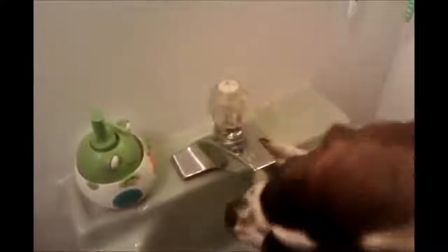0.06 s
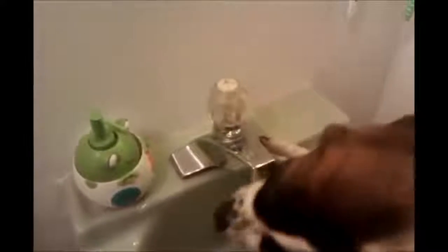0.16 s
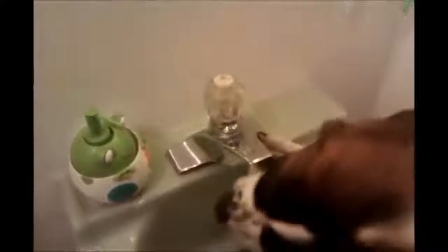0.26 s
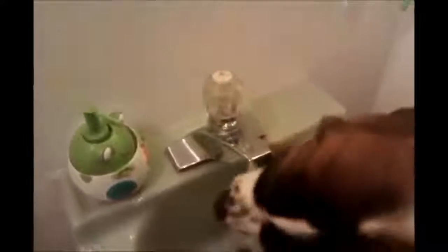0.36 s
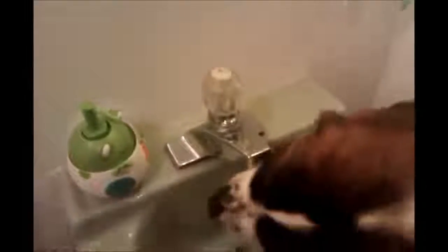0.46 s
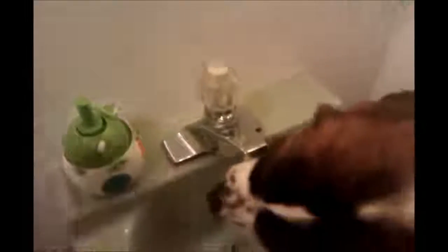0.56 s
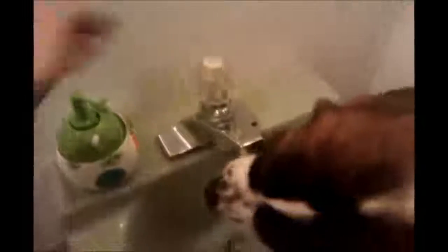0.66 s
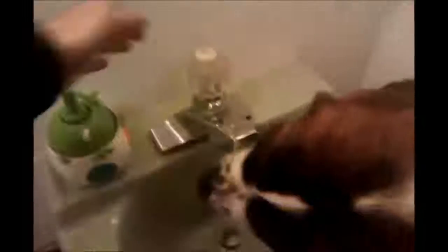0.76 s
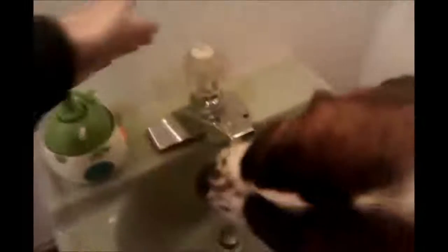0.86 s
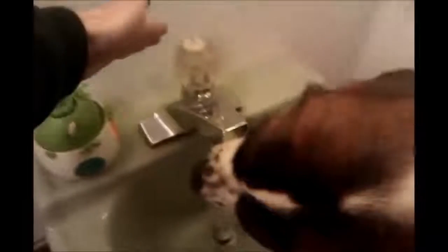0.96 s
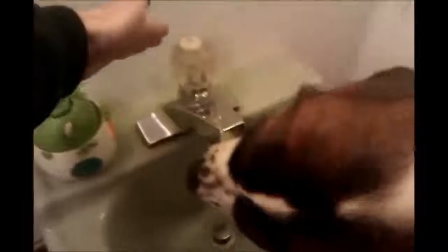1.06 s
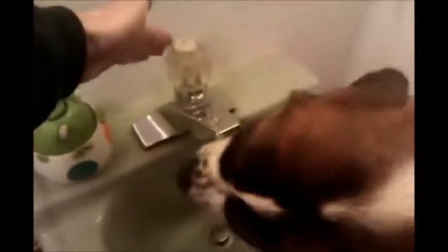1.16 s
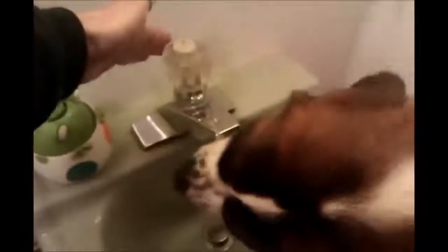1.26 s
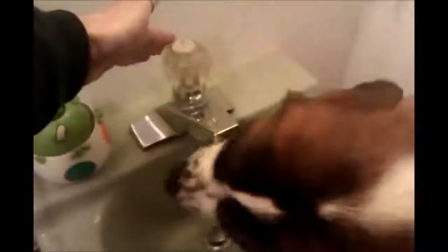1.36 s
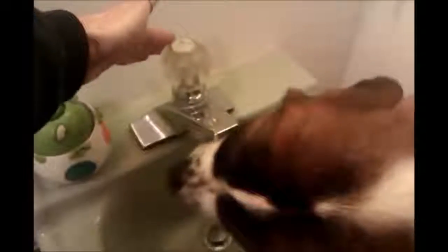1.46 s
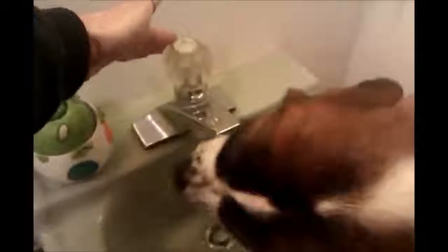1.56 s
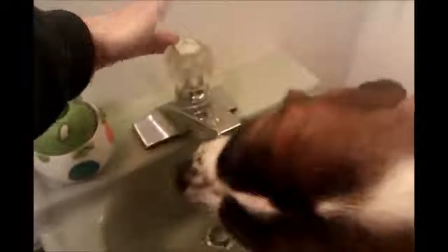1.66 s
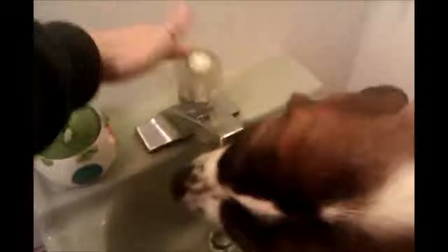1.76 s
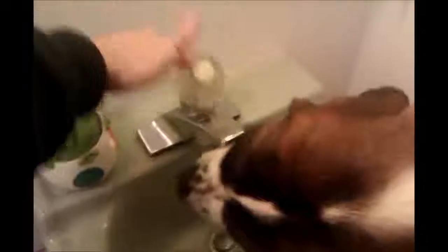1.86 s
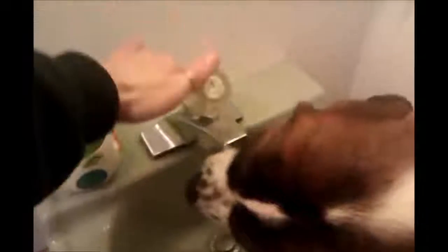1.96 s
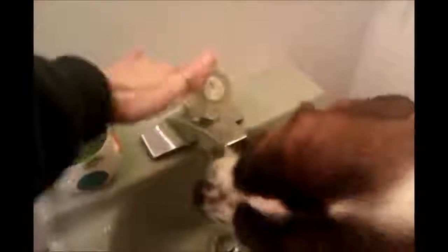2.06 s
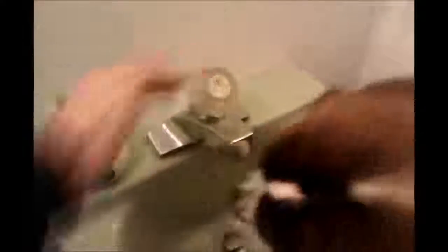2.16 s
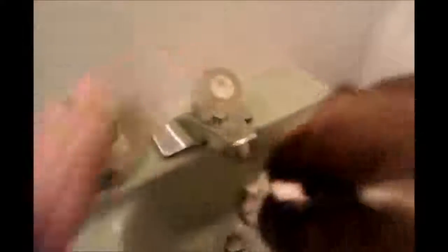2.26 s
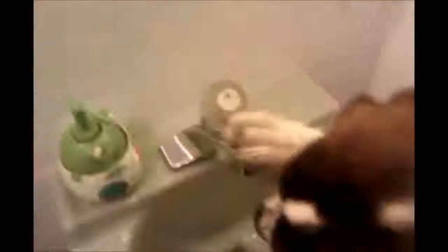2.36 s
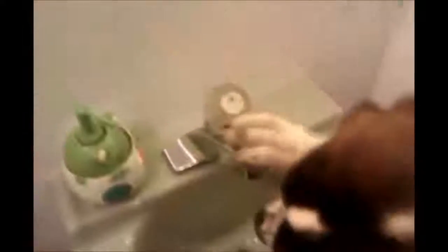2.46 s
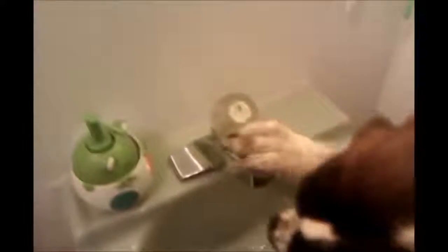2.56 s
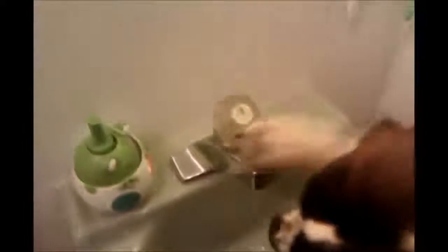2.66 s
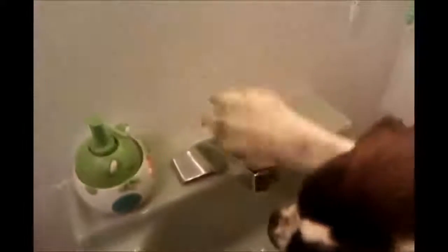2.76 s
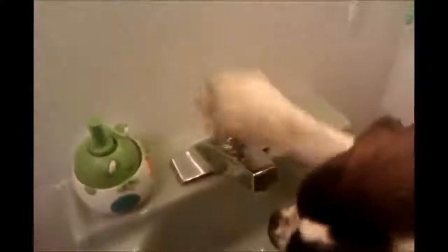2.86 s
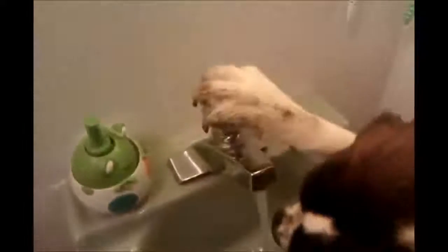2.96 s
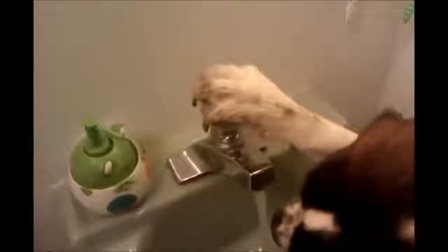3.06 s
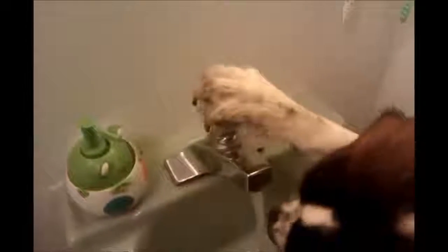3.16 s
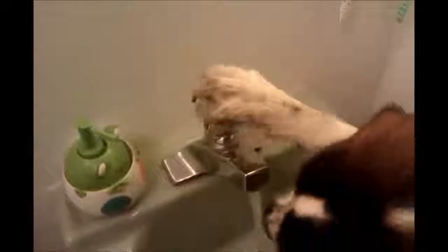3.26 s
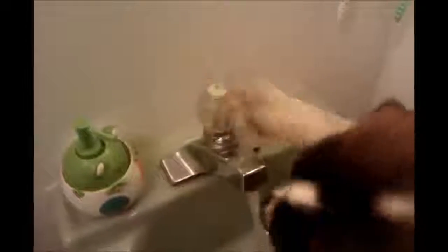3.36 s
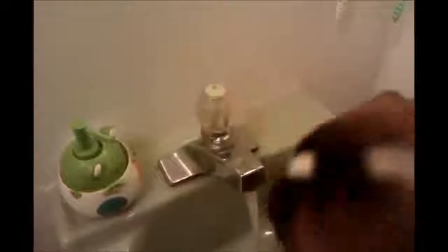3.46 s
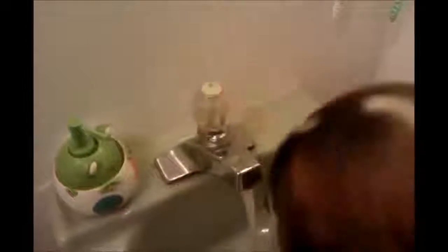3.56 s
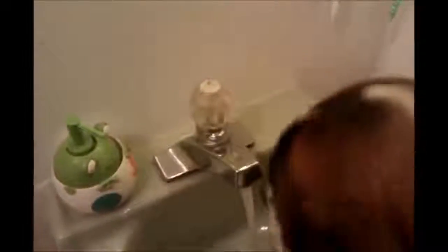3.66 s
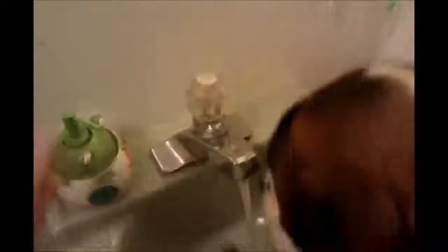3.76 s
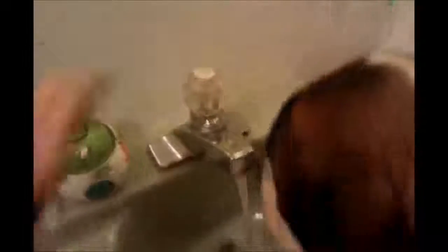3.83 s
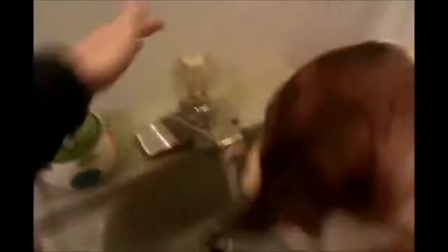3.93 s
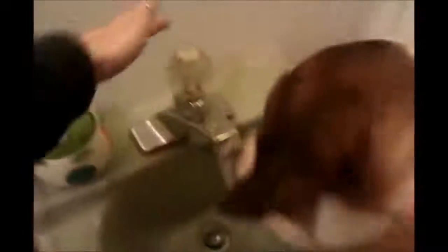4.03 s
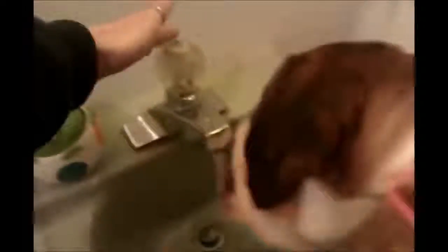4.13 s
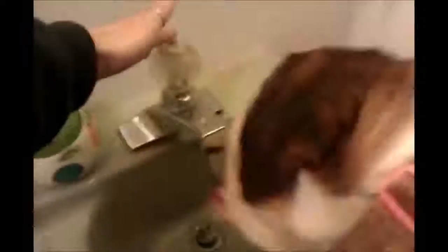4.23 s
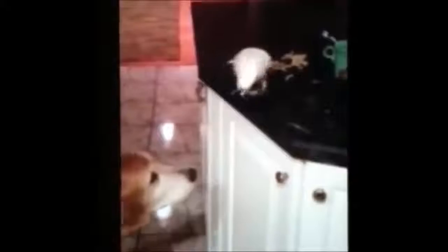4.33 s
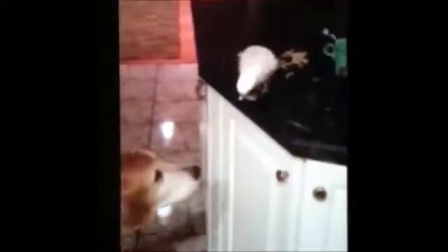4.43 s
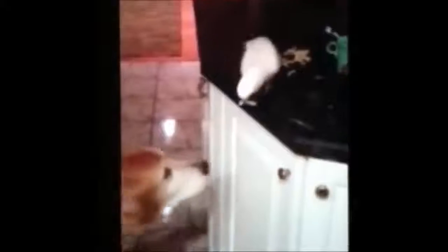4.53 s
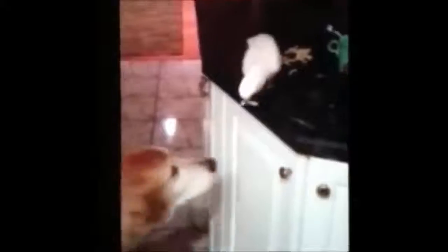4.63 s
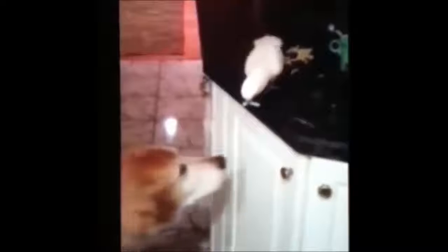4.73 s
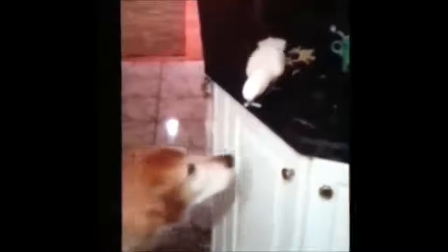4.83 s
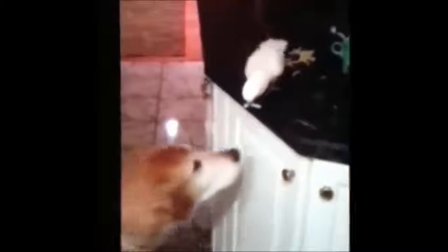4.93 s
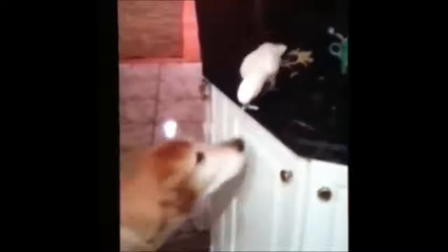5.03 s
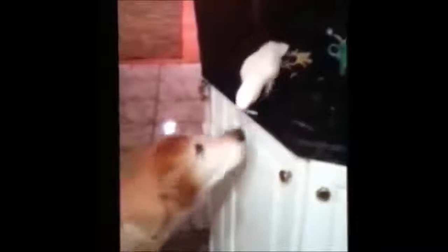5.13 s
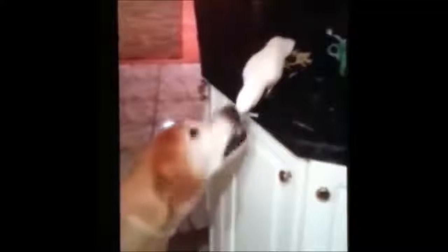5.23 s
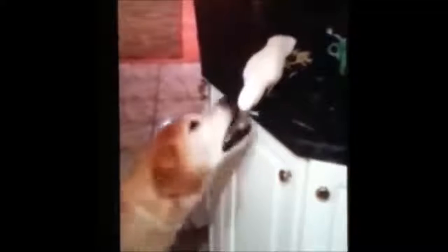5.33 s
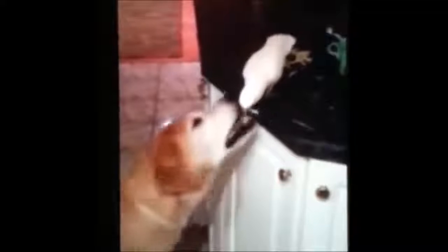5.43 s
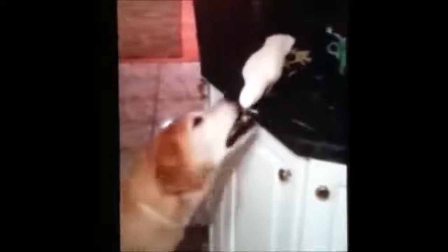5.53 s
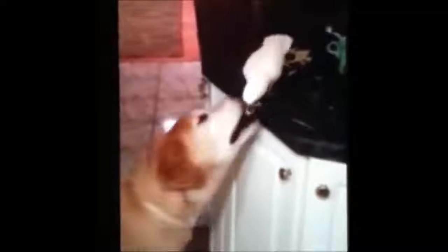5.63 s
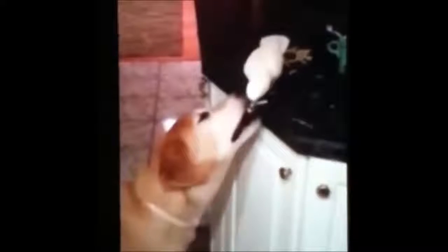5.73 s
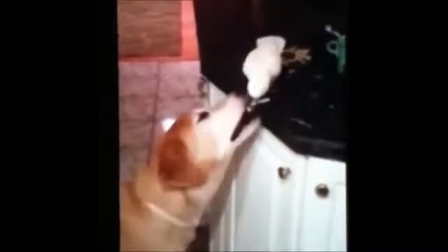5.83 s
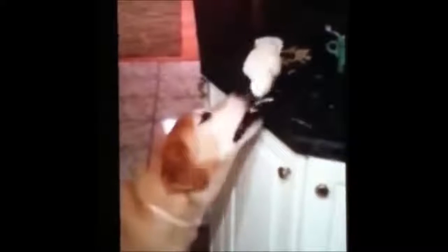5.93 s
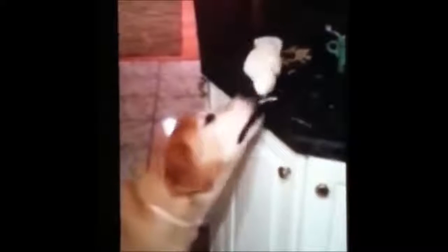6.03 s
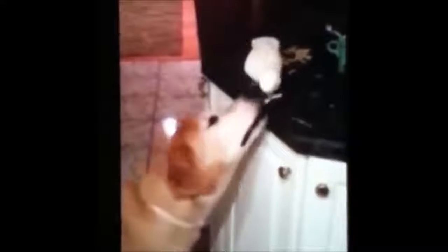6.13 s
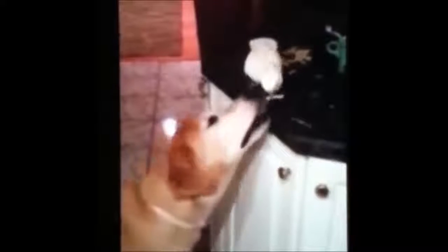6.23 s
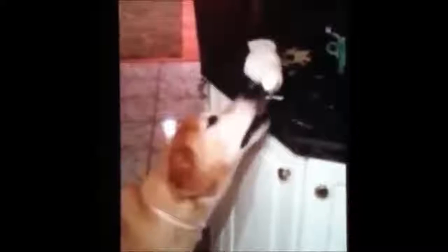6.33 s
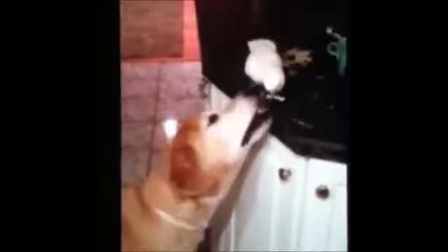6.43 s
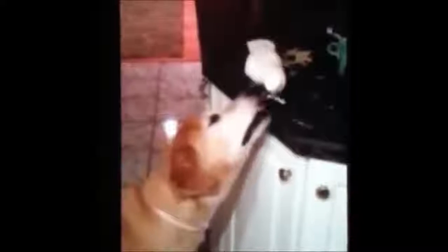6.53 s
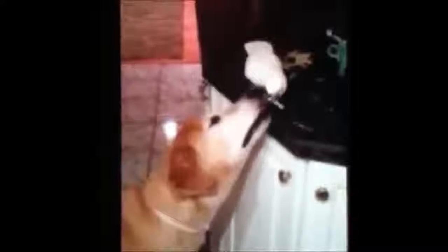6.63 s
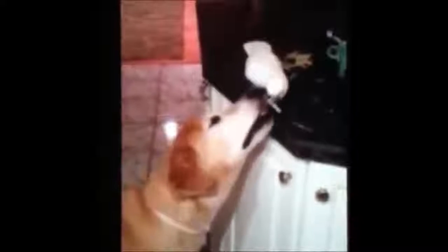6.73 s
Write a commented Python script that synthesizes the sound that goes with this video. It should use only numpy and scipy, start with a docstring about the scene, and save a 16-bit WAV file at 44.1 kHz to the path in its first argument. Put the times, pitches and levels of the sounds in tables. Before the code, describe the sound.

A thin stream patters and gurgles into a bathroom basin while a dog laps, making irregular splashes and plips. A tiny squeak, and the water drops to a trickle. Hard, bright metallic knocks and dull bumps follow as a paw hits the knob, and the stream returns fuller. It cuts abruptly to a quiet kitchen with faint hollow air noise, one dry pop and soft wooden knocks. Close handheld microphone, small hard room, slight rumble.

```python
"""A thin stream runs from a bathroom tap into the basin while a dog laps at it: random drops and gliding bubbles.
The water is turned down to a trickle; a paw knocks against the knob, heard as ringing metal, and opens it again.
A squeak (two thin tones), soft bumps, hum and a low rumble accompany it in a small hard room.
At 4.372 s the scene cuts to a quiet kitchen: shaped noise, one dry pop and a few soft wooden knocks."""
import sys
import numpy as np
from scipy import signal
from scipy.fft import rfft, irfft, next_fast_len
from scipy.io import wavfile

SR = 44100
rng = np.random.default_rng(int(sys.argv[2]) if len(sys.argv) > 2 else 0)


def log_audio(samples):
    """Write samples as a 16-bit WAV file to the path given in sys.argv[1]."""
    # one column per channel
    frames = np.atleast_2d(samples).T
    # limit to full scale, then quantise
    limited = np.clip(frames, -1, 1)
    pcm = np.round(limited * 32767).astype(np.int16)
    wavfile.write(sys.argv[1], SR, pcm)


N = 299713
TIME = np.arange(N) / SR
CUT_S = 4.372   # the bathroom ends and the kitchen begins

# In the tables, level_db values are relative settings; fade_s is the time taken to fall by 60 dB.


def from_db(db):
    """Turn decibels into a gain."""
    return 10 ** (np.asarray(db) / 20)


def rms_one(x):
    """Scale a sound to an rms (average strength) of 1."""
    return x / np.sqrt(np.mean(x ** 2) + 1e-20)


def in_time(rows):
    """Draw one curve over time for each column after the first."""
    s, *columns = np.transpose(rows)
    return [np.interp(TIME, s, column) for column in columns]


def add(out, s, sound):
    """Mix a sound in at time s."""
    start = max(round(s * SR), 0)
    out[start:start + len(sound)] += sound[:N - start]


def fade(fade_s):
    """Make an envelope that dies by 60 dB in fade_s."""
    return from_db(-60 * np.arange(int(fade_s * SR) + 1) / (fade_s * SR))


def band(x, low_hz, high_hz, order=2):
    """Keep the pitches between two edges (Butterworth band-pass)."""
    edges = np.clip([low_hz, high_hz], 10, .45 * SR)
    return signal.sosfilt(signal.butter(order, edges, "band", fs=SR, output="sos"), x + 1e-18)


def resonate(x, peaks):
    """Pass a sound through side-by-side resonances; a narrow one rings longer."""
    out = 0
    for hz, width_hz, db in peaks:
        r = np.exp(-np.pi * width_hz / SR)
        feedback = [1, -2 * r * np.cos(2 * np.pi * hz / SR), r * r]
        gain = from_db(db) * (1 - r * r) / 2
        out = out + gain * signal.lfilter([1, 0, -1], feedback, x + 1e-18)
    return out


def ring(force, hz, fade_s):
    """Let a push set a dying sine ringing; a click of 1 starts it at height 1."""
    r, w = from_db(-60 / (fade_s * SR)), 2 * np.pi * hz / SR
    return signal.lfilter([0, np.sin(w)], [1, -2 * r * np.cos(w), r * r], force + 1e-18)


def struck(s, db, hz, fade_s, rise_cycles=0.78):
    """Start one dying sine at time s that builds up within about a cycle."""
    out, shape = np.zeros(N), fade(fade_s)
    turns = hz * TIME[:len(shape)]
    rise = np.minimum(turns / rise_cycles, 1)
    add(out, s, from_db(db) * shape * rise * np.sin(2 * np.pi * turns))
    return out


def colour(x, spectrum):
    """Reshape a steady sound by a curve of level over pitch."""
    hz, db = np.transpose(spectrum)
    size = next_fast_len(N)
    bins = np.maximum(np.fft.rfftfreq(size, 1 / SR), 1)
    gain = from_db(np.interp(np.log(bins), np.log(hz), db))
    return irfft(rfft(x, size) * gain, size)[:N]


def drift(rate):
    """Wander by chance with spread 1, heading for a new value rate times a second."""
    knots = rng.standard_normal(1024)
    return rms_one(np.interp(TIME * rate, np.arange(len(knots)), knots))


def grains(per_s, spread_db):
    """Scatter clicks of unequal size and random sign."""
    sizes = from_db(spread_db * np.minimum(rng.exponential(1, N), 5))
    return (rng.random(N) < per_s / SR) * sizes * rng.choice([-1, 1], N)


def bursts(table, texture, spread, rise_s):
    """Cut quickly rising, fading bursts from a texture, each in a band around its own centre."""
    out = np.zeros(N)
    reach = max(spread, 1.1)
    for s, db, hz, fade_s in table:
        shape = fade(fade_s)
        shape = shape * (1 - np.exp(-TIME[:len(shape)] / rise_s))
        piece = texture[round(s * SR):][:len(shape)]
        burst = band(piece * shape, hz / reach, hz * reach)
        add(out, s, from_db(db) * burst * np.linalg.norm(shape) / np.linalg.norm(burst))
    return out


def room(x, fade_s, wet_db, wall_hz):
    """Add dense reflections off hard walls, starting a few ms after the direct sound."""
    shape = fade(fade_s)
    tail = band(rng.standard_normal(SR * 2), 67, wall_hz, order=1)[:len(shape)] * shape
    tail[:SR // 400] = 0
    return x + from_db(wet_db) * signal.fftconvolve(x, tail / np.linalg.norm(tail))[:N]


# Steady tones of the bathroom mains hum: pitch_hz, level_db
HUM = [(119.5, -59), (240, -82)]


def mains_hum():
    """Hum in two steady sines."""
    return sum(from_db(db) * np.sin(2 * np.pi * hz * TIME) for hz, db in HUM)


# Moments when the microphone is jolted: start_s, level_db
JOLTS = [(0.65, -41), (2.62, -42), (2.75, -46.5), (3.0, -44), (3.1, -42.5), (3.739, -37.5)]
JOLT_RISE_S, JOLT_FADE_S = .05, 0.88
HELD_DB = -58.5   # rumble of the steady hand


def handling_rumble():
    """Rumble as low noise; each jolt swells quickly and dies away over that of the steady hand."""
    jolts = np.zeros(N)
    shape = np.r_[np.linspace(0, 1, int(JOLT_RISE_S * SR)), fade(JOLT_FADE_S)]
    for s, db in JOLTS:
        add(jolts, s, from_db(db) * shape)
    # pitch_hz, level_db
    low_spectrum = [(8, -20.0), (18, -3.0), (28, -18.0), (45, -30.5), (100, -26.5), (400, -61.0)]
    sway = rms_one(colour(rng.standard_normal(N), low_spectrum))
    return np.hypot(jolts, from_db(HELD_DB)) * sway


# Spectrum of the quiet kitchen air: pitch_hz, level_db (per Hz)
KITCHEN = [(18, -54.5), (30, -32), (43, -7), (85, -7.5), (113, 0.5), (211, -5), (328, -6), (426, -8.5),
           (485, -9.5), (581, -11.5), (1000, -8.5), (1240, -17), (1650, -15), (1830, -19), (15000, -26)]
KITCHEN_DB = -61


def kitchen_air():
    """Fill the kitchen with shaped noise and a faint hollow drone from two resonances."""
    air = from_db(KITCHEN_DB) * rms_one(colour(rng.standard_normal(N), KITCHEN))
    drone = rms_one(resonate(rng.standard_normal(N), [(1102, 47, 2), (1580, 103, -20)]))
    return air + from_db(-72.0) * drone


# Soft knocks and shuffles in the kitchen: start_s, level_db, centre_hz, fade_s
KNOCKS = [(5.338, -45, 1000, 0.05), (5.340, -53, 500, 0.2), (5.339, -58, 1560, 0.36),
          (5.834, -55, 1040, 0.12), (6.143, -60, 820, 0.25), (6.205, -61, 980, .1)]
# Wooden resonances of the cupboard: pitch_hz, width_hz, level_db
CUPBOARD = [(367, 41, -4), (645.5, 46, -5.5), (870, 62, 3.5), (1060, 50, 4), (1540, 29, 4)]
KNOCK_RING_DB, CUPBOARD_FADE_S = -9.5, 0.29


def cupboard_knocks():
    """Scuff the cupboard softly; the wood rings on, most at pitches near the knock's own."""
    scuffs = bursts(KNOCKS, resonate(rng.standard_normal(N), CUPBOARD), spread=1.31, rise_s=0.00072)
    rings = np.zeros(N)
    for s, db, hz, _ in KNOCKS:
        for mode_hz, _, mode_db in CUPBOARD:
            distance_db = 20 * abs(np.log2(mode_hz / hz))
            rings += struck(s, db + KNOCK_RING_DB + mode_db - distance_db, mode_hz, CUPBOARD_FADE_S)
    return scuffs + rings


# Short tones inside the dry pop: pitch_hz, level_db, fade_s
POP = [(385, 12.5, 0.0062), (787, 6.5, 0.0079), (1400, -4, 0.011), (2190, -17, .004)]
POP_S, POP_DB = 4.8235, -27.5


def dry_pop():
    """Let one click set a few very short tones ringing, with the click itself mixed in upside down."""
    snap = np.zeros(N)
    add(snap, POP_S, from_db([POP_DB]))
    tones = sum(from_db(db) * ring(snap, hz, fade_s) for hz, db, fade_s in POP)
    return band(tones - 4.0 * band(snap, 300, 10200, order=1), 310, 10400)


def kitchen():
    """Place a dry pop close by and echoing soft knocks further off, with the top cut at 15200 Hz."""
    distant_knocks = room(cupboard_knocks(), fade_s=0.78, wet_db=-11.5, wall_hz=4040)
    quiet = kitchen_air() + dry_pop() + distant_knocks
    return signal.sosfilt(signal.ellip(8, .2, 60, 15200, fs=SR, output="sos"), quiet)


# Low resonances of the bowl, drummed by the stream and by bumps: pitch_hz, width_hz, level_db
DRUM = [(82.3, 16, -2.5), (157.3, 85, -1.5), (215, 40, -4), (289, 52, 2.5), (351.4, 66, -7),
        (466.5, 51.6, -15), (648, 51.5, -10), (887, 730, -12)]
DRUM_DB, DRUM_LIVELY_DB = -25, 7   # below the loudest water; added as the drumming grows


def bowl_drumming(water_db, flow, liveliness):
    """Drum on the bowl's low resonances with noise that follows the flow and the liveliness curve."""
    level_db = water_db.max() + DRUM_DB + DRUM_LIVELY_DB * liveliness
    return rms_one(resonate(rng.standard_normal(N), DRUM)) * from_db(level_db) * np.sqrt(flow)


# Soft bumps against the basin: start_s, level_db, centre_hz, fade_s
BUMPS = [(0.655, -42, 316, 0.97), (0.944, -36, 456, 0.25), (1.439, -41.5, 295, 0.26),
         (1.713, -39, 170, 0.25), (1.744, -36, 73.6, 0.3), (2.159, -34, 240, 0.17), (2.25, -53, 480, .3),
         (2.570, -34.5, 620, 0.3), (2.604, -25.5, 420, 0.065), (2.614, -31, 830, 0.12),
         (2.623, -30, 358, 0.06), (2.624, -35, 620, .06), (2.640, -35.5, 230, .1),
         (2.674, -32.5, 380, 0.15), (2.68, -43.5, 660, .2), (2.77, -51, 214, 0.44),
         (2.913, -46.5, 474, 0.32), (2.995, -32, 722, 0.063), (3.009, -24.5, 240, 0.067),
         (3.011, -32, 480, 0.13), (3.038, -36, 380, 0.08), (3.062, -37, 269, 0.25), (3.103, -31, 635, 0.15),
         (3.104, -31, 420, 0.056), (3.107, -31, 190, .07), (3.138, -29.5, 280, 0.066),
         (3.141, -37.5, 800, 0.13), (3.169, -36.5, 110, 0.14), (3.172, -35, 307, 0.17),
         (4.18, -38.5, 920, 0.12)]
CLAWS_PER_S = 900   # small contacts after a bump
KICK_HZ = 330   # the first contact is kept from an octave below this to two above


def bumps(scuff_db=-6, judder_db=-1.0, thud_db=-1.5, thud_share=0.7, contact_db=20):
    """Bump with a hard contact and a pitched thud; small contacts then scuff the bowl and make it drum."""
    contacts = grains(CLAWS_PER_S, spread_db=1.8)
    scuff = from_db(scuff_db) * rms_one(band(contacts, 250, 2200))
    judder = rms_one(resonate(contacts, DRUM)) + scuff
    first = np.zeros(N)
    for s, db, _, _ in BUMPS:
        add(first, s, from_db([db + contact_db]))
    thuds = sum(struck(s, db + thud_db, hz, thud_share * fade_s) for s, db, hz, fade_s in BUMPS)
    shaking = bursts(BUMPS, judder, spread=1.96, rise_s=0.0012)
    return band(first, KICK_HZ / 2, KICK_HZ * 4) + thuds + from_db(judder_db) * shaking


# The valve's single squeak as the knob is turned: pitch_hz, level_db (peak), fade_s
SQUEAK = [(6530, -26.5, 0.077), (11870, -36, 0.084)]
SQUEAK_S, SQUEAK_RISE_S = 1.561, 0.005


def squeak(waver=0.0019):
    """Slip the valve's seal so it sings in two thin, slightly unsteady tones that swell and fade."""
    out, speed = np.zeros(N), 1 + waver * drift(rate=130)
    for hz, db, fade_s in SQUEAK:
        shape = fade(fade_s)
        shape = shape * (1 - np.exp(-TIME[:len(shape)] / SQUEAK_RISE_S)) ** 2
        tone = np.sin(2 * np.pi * hz * np.cumsum(speed[:len(shape)]) / SR)
        add(out, SQUEAK_S, from_db(db) * shape / shape.max() * tone)
    return out


# Paw and claws on the tap: start_s, level_db, brightest_hz, roughness (0 to 1)
TAP_HITS = [(2.569, -24.5, 3500, 0.53), (2.578, -8, 3750, 0), (2.605, -23.5, 3440, 0.44),
            (2.671, -9, 3595, 0.08), (2.680, -7.5, 3527, 0.02), (2.672, -14.5, 8700, 0.03),
            (2.856, -44, 4550, 0.34), (2.902, -28.5, 3843, 0.07), (2.984, -8.5, 3773, 0.07),
            (3.105, -13, 2830, 0.62), (3.113, -29, 2730, 0.8)]
# Tones the metal tap rings with: pitch_hz, level_db, fade_s
TAP = [(1585, 11, 0.032), (1995, 5.5, 0.036), (2616, 2, 0.047), (3000, 1.5, 0.042), (3555, 2, 0.039),
       (3640, -1.5, 0.064), (3860, -3.5, 0.014), (3895, 10, 0.023), (4397, 5, .025), (5330, -8, .03),
       (6750, -14, 0.03), (8660, -0.5, 0.02), (9485, -8, .02)]


def tap_knocks(clean_octaves=0.0088, rough_octaves=0.91, leak_db=-34, ring_db=0, rattle_db=-6,
               rattle_fade_s=0.11, chatter_db=-11, chatter_fade_s=0.09):
    """Ring few tones with a clean blow, many with a rough one; the loose knob chatters on after each."""
    s, db, bright_hz, rough = np.transpose(TAP_HITS)
    rough = np.clip(rough, .01, .99)
    reach_octaves = clean_octaves + rough_octaves * rough ** 2
    contacts, dying = grains(per_s=1800, spread_db=-2.5), fade(chatter_fade_s)
    blows = []
    for start in s:
        chatter = contacts[round(start * SR):][:len(dying)] * dying
        blows.append(np.r_[1, from_db(chatter_db) * chatter / np.linalg.norm(chatter)])
    out = np.zeros(N)
    for hz, mode_db, fade_s in TAP:
        force = np.zeros(N)
        coupling = .5 ** (np.abs(np.log2(hz / bright_hz)) / reach_octaves) + from_db(leak_db)
        strengths = np.sqrt(1 - rough) * coupling * from_db(db + mode_db)
        for start, strength, blow in zip(s, strengths, blows):
            add(force, start, strength * blow)
        # the narrow band makes each tone take a moment to build up
        out += band(ring(force, hz, fade_s), hz / 1.06, hz * 1.06, order=1)
    rows = zip(s, db + 10 * np.log10(rough), bright_hz, np.full(len(s), rattle_fade_s))
    rattles = bursts(rows, rng.standard_normal(N), spread=1.56, rise_s=0.00078)
    return from_db(ring_db) * out + from_db(rattle_db) * rattles


def fizz(per_s, spread_db, cycles, low_hz, high_hz, glide=0.11):
    """Ring small bubbles at random times, each with a rising pitch; rms 1 up to the cut."""
    when, pitch, size, sign = rng.random((30000, 4))[:int(per_s * CUT_S)].T
    pitches = low_hz + (high_hz - low_hz) * pitch * np.sqrt(pitch)
    rarity = np.minimum(-np.log(size), np.log(100))   # a few bubbles are much louder than the rest
    heights = np.copysign(from_db(spread_db * rarity) * np.sqrt(pitches), sign - .5)
    out = np.zeros(N)
    for s, hz, height in zip(when * CUT_S, pitches, heights):
        turns = hz * TIME[:int(cycles / hz * SR)]
        age = turns / cycles
        dying = np.exp(-np.log(1000) * age)
        add(out, s, height * dying * np.sin(2 * np.pi * turns * (1 + glide * age)))
    out = band(out, low_hz, high_hz)
    return out / out[TIME < CUT_S].std()


SPATTERS_PER_S, LAPPING_ENDS_S = 6.7, 2.2
SPATTER_DB, SPATTER_SPREAD_DB = 0, 2   # level above the water, and how far it strays either way
SPATTER_HZ, SPATTER_OCTAVES, SPATTER_FADE_S = 3600, 0.6, 0.023


def spatters():
    """List small chance splashes while the dog laps, growing with the flow, as rows like the big ones."""
    when, size, pitch = rng.random((200, 3))[:int(SPATTERS_PER_S * LAPPING_ENDS_S)].T
    s = when * LAPPING_ENDS_S
    flow_s, flow_db = np.transpose(FLOW)
    db = np.interp(s, flow_s, flow_db) + SPATTER_DB + SPATTER_SPREAD_DB * (2 * size - 1)
    centre_hz = SPATTER_HZ * 2 ** (SPATTER_OCTAVES * (2 * pitch - 1))
    return list(zip(s, db, centre_hz, np.full(len(s), SPATTER_FADE_S)))


# Big splashes, as the tongue or a surge breaks the stream: start_s, level_db, centre_hz, fade_s
SPLASHES = [(0.139, -21, 3770, 0.13), (0.326, -28, 4900, 0.3), (0.407, -28.5, 1130, 0.05),
            (0.482, -36, 950, .05), (0.418, -22, 3770, 0.045), (0.475, -25, 6000, 0.04),
            (0.519, -27.5, 2380, 0.11), (0.541, -20, 4320, 0.049), (0.696, -29, 6500, .06),
            (0.749, -26.5, 4160, 0.32), (0.771, -31, 10500, .1), (0.946, -23.5, 2650, 0.094),
            (0.988, -19, 1490, 0.028), (1.003, -14, 4340, 0.049), (1.018, -20.5, 3880, 0.057),
            (1.236, -24, 4800, 0.078), (1.299, -23, 3150, 0.077), (1.345, -24, 2840, 0.097),
            (1.363, -26.5, 1450, 0.12), (1.381, -29, 1460, .08), (1.592, -31, 2580, 0.24),
            (1.407, -25, 3500, 0.12), (1.449, -29.5, 4800, 0.072), (1.644, -23, 2030, 0.11),
            (1.688, -29.5, 1200, 0.17), (1.685, -22.5, 3830, 0.13), (1.685, -36, 11000, 0.054),
            (1.77, -38, 1400, .14), (1.845, -32, 5070, 0.14), (1.888, -23, 3080, 0.07),
            (2.002, -22, 3620, 0.15), (2.066, -41, 1340, .06), (2.093, -30.5, 3300, 0.2),
            (2.108, -38, 1100, .1), (2.224, -23, 4300, 0.087), (2.305, -52, 9600, .1),
            (2.335, -37, 2400, 0.086), (2.404, -47, 1700, 0.073), (2.426, -42, 4300, 0.031),
            (2.455, -35, 3000, 0.1), (2.479, -40, 3650, 0.16), (2.922, -32, 2690, 0.08),
            (2.946, -46.5, 9000, 0.068), (2.985, -32, 1680, .07), (3.2, -45, 1100, .2),
            (3.294, -24, 2460, 0.16), (3.325, -31, 1830, 0.048), (3.604, -27, 3850, 0.09),
            (3.694, -27, 4630, 0.15), (3.732, -27, 3750, 0.14), (4.18, -27, 3120, .06),
            (4.222, -26, 3500, 0.081), (4.289, -32.5, 1500, 0.07), (4.351, -30, 4500, 0.035)]


def splashes():
    """Land flung water as short showers of droplets and bubbles."""
    droplets = rms_one(grains(per_s=9200, spread_db=4.5))
    froth = fizz(per_s=1800, spread_db=.5, cycles=24, low_hz=840, high_hz=9100)
    shower = droplets + from_db(-3.0) * froth
    return bursts(list(SPLASHES) + spatters(), shower, spread=1.536, rise_s=0.00079)


# Heavy single drops: start_s, level_db (peak), pitch_hz, ringing_cycles
DROPS = [(0.14, -3, 4330, 8), (0.597, -12, 4000, 10), (0.793, -9, 6300, 12), (0.9305, -21, 7800, 30),
         (1.0035, -11.5, 3440, 24), (1.0028, -6.5, 7400, 12), (1.010, -5.5, 5900, 27),
         (1.272, -19, 7960, 22), (1.431, -13.5, 8250, 18), (1.827, -20, 3300, 15), (2.093, -12, 4240, 20),
         (2.224, -15, 3450, 14), (2.3355, -27, 4700, 25), (2.335, -24, 2600, 16), (2.358, -35, 3980, 28),
         (2.427, -23, 4900, 44), (2.452, -23, 3100, 14), (2.455, -24, 4200, 30), (2.486, -26.5, 3980, 24),
         (2.514, -31, 4400, 55), (2.856, -39, 5230, 40), (3.544, -10.5, 6000, 11), (3.699, -12, 5500, 8),
         (3.750, -10.5, 5030, 7), (3.962, -15.5, 4400, 6.3), (4.02, -14, 4910, 19), (4.050, -17, 10000, 45),
         (4.116, -15, 10000, 20), (4.214, -23, 10900, 61), (4.256, -37, 5160, 10)]


def drops():
    """Slap the wet bowl: a tick if it dies within a few cycles, a plip if it traps air and rings on."""
    return band(sum(struck(s, db, hz, cycles / hz) for s, db, hz, cycles in DROPS), 1490, 16000)


# The loudest single bubbles: start_s, level_db (peak), starting_pitch_hz, rise_octaves
BUBBLES = [(0.043, -21.5, 4200, 0.12), (0.088, -24, 2750, 0.11), (0.140, -21, 2450, 0.11),
           (0.268, -24, 2880, .05), (0.518, -21.5, 2400, 0.12), (0.946, -18.5, 2400, 0.35),
           (0.9495, -20, 2800, 0.12), (1.020, -16.5, 3400, 0.11), (1.072, -23, 4500, 0.11),
           (1.230, -11, 2280, 1.5), (1.273, -21, 3600, 0.61), (1.346, -24.5, 2134, 0.23),
           (1.347, -33, 913, 0.02), (1.359, -32.5, 877, 0.04), (1.360, -24, 1335, 0.2),
           (1.378, -29.5, 1030, 0.18), (1.406, -22.5, 2560, 0.29), (1.429, -17.5, 3470, 0.11),
           (1.4475, -16, 3540, 0.66), (1.5155, -19, 2600, 0.48), (1.641, -26, 1406, .2),
           (1.641, -25, 852, 0.05), (1.649, -29, 795, 0.05), (1.651, -31, 1490, .1),
           (1.654, -26, 2170, 0.35), (1.723, -20, 3600, .1), (1.825, -23, 2300, 0.51),
           (2.015, -29, 1480, 0.12), (2.065, -29.5, 1244, 0.24), (2.095, -28, 2720, 0.26),
           (2.117, -31.5, 990, 0.28), (2.239, -28, 2730, 0.19), (2.334, -38.5, 1070, 0.089),
           (2.372, -38, 1140, 0.15), (2.425, -29.5, 3360, 0.19), (2.454, -25.5, 2044, 0.044),
           (2.462, -33.5, 2000, 0.017), (2.477, -38, 1980, .06), (2.527, -38.5, 2130, .1),
           (2.563, -34.5, 1980, .04), (2.755, -36.5, 1940, .1), (2.899, -31.5, 3100, .35),
           (2.921, -42.5, 1030, .04), (2.946, -31.5, 2780, .12), (3.296, -19, 1940, 0.09),
           (3.304, -19, 1900, 0.18), (3.452, -27, 2900, 0.0496), (3.606, -17, 3900, 0.067),
           (3.620, -20.5, 3400, .08), (3.731, -24, 3400, .08), (3.983, -22.5, 2780, .06),
           (4.060, -28.5, 1880, 0.073), (4.183, -24, 2980, .08), (4.239, -18.5, 2800, .1),
           (4.263, -26, 3110, .08), (4.364, -28, 2750, .08), (4.297, -27, 1890, 0.14)]
BUBBLE_CYCLES = 15   # length of a bubble in cycles of its starting pitch, so the big, low ones last longest
# Drain resonances set ringing by low bubbles: pitch_hz, width_hz, level_db
DRAIN = [(800.5, 11.95, 5.5), (857, 26, -0.5)]


def bubbles():
    """Glide each bubble's pitch upward as it nears the surface; the lowest ring on in the drain."""
    out = np.zeros(N)
    for s, db, hz, octaves in BUBBLES:
        age = np.linspace(0, 1, int(BUBBLE_CYCLES / hz * SR))
        phase = 2 * np.pi * np.cumsum(hz * 2 ** (octaves * age)) / SR
        swell = np.sin(np.pi * age ** 0.95)
        add(out, s, from_db(db) * swell * np.sin(phase))
    return out + resonate(out, DRAIN)


# Echoes off the sides of the bowl: delay_s, level_db
BASIN_ECHOES = [(.0019, -12), (.0037, -9)]
WANDER, WANDER_PER_S = 0.0411, 9   # typical share by which the delays change, and how often


def basin_echoes(x):
    """Shift the water's colour with echoes whose delays change as the stream wanders over the bowl."""
    out = x
    for delay_s, db in BASIN_ECHOES:
        delay = delay_s * (1 + WANDER * drift(WANDER_PER_S))
        out = out + from_db(db) * np.interp(TIME - delay, TIME, x)
    return out


GURGLE_DB, GURGLE_LIVELY_DB = -38, 24.5   # relative to the water; added as the gurgling grows


def gurgle(water_db, liveliness):
    """Gurgle with low bubbles whose level follows the water and the liveliness curve."""
    level_db = water_db + GURGLE_DB + GURGLE_LIVELY_DB * np.clip(liveliness, 0, 1)
    return from_db(level_db) * fizz(per_s=440, spread_db=3.0, cycles=21, low_hz=623, high_hz=1783)


# Flow from the tap (running, a trickle, knocked open again), as the level of the water: time_s, level_db
FLOW = [(0, -30), (0.26, -30.5), (0.45, -32), (0.63, -31.5), (0.72, -30), (0.9, -33.5), (1.11, -32.5),
        (1.19, -34.5), (1.42, -31), (1.51, -35), (1.72, -30.5), (1.8, -34.5), (1.86, -31.5), (1.93, -35.5),
        (2.12, -34), (2.219, -45.5), (2.3, -55), (2.35, -46.5), (2.49, -48), (2.56, -52), (2.87, -56.5),
        (3.095, -50), (3.125, -39), (3.26, -36.5), (3.32, -29.5), (3.9, -29.5), (4.23, -29.5), (4.29, -31),
        (4.34, -28.5)]
# How strongly the water gurgles, plinks and drums on the bowl: time_s, share (0 to 1)
LIVELINESS = [(0, 0.59), (1.05, 1), (1.7, 0.96), (2.13, 0.78), (2.3, 1), (3.0, 1), (3.15, 0.7), (3.9, 0.39),
              (4.2, 0.59)]
# Fine spray that hisses when the stream hits the bowl freely: time_s, level_db
SPRAY = [(0, -40.5), (0.42, -39), (0.63, -44.5), (0.75, -41.5), (0.97, -46.5), (1.11, -39), (1.2, -48.5),
         (1.3, -43.5), (1.58, -48), (1.72, -38.5), (1.79, -57.5), (1.85, -44.5), (2.1, -49.5),
         (2.25, -48.5), (2.42, -58), (2.55, -65), (3.09, -68.5), (3.125, -45.5), (3.27, -52.5),
         (3.315, -38), (3.85, -38.5), (4.23, -38), (4.29, -42.5), (4.35, -36.5)]
# Colour of the water: pitch_hz, level_db (per Hz)
WATER = [(400, -40.5), (900, -23), (1300, -9.5), (1700, -4.5), (2200, -5.5), (3000, -4), (4200, -1.5),
         (6000, 0), (7000, -7.5), (8500, -8.5), (11100, -8), (12100, -18.5), (15500, -21)]
# Hollows of the basin that colour the water: pitch_hz, width_hz, level_db
BASIN = [(1710, 140, -2), (2845, 210, 1), (10000, 920, -19.5)]


def stream(drops_per_s=9000, fizz_db=-3.5, plinks_db=-3.5, pips_db=-4.0, drips_db=3, flutter_db=1.5,
           water_gain_db=-0.5):
    """Patter drops on the bowl amid fizzing bubbles; as the flow falls, separate drips come forward."""
    (water_db,), (liveliness,), (spray_db,) = in_time(FLOW), in_time(LIVELINESS), in_time(SPRAY)
    flow = from_db(water_db - water_db.max())
    patter = rms_one(grains(drops_per_s, spread_db=2.5))
    froth = fizz(per_s=2200, spread_db=2.0, cycles=53, low_hz=1324.0, high_hz=12770)
    drips = fizz(per_s=330, spread_db=3.5, cycles=30, low_hz=1200, high_hz=5900)
    plinks = fizz(per_s=380, spread_db=1.5, cycles=85, low_hz=2300, high_hz=11000, glide=.04)
    pips = fizz(per_s=200, spread_db=1.8, cycles=55, low_hz=2000, high_hz=11500, glide=.1)
    lively = (from_db(plinks_db) * plinks + from_db(pips_db) * pips) * liveliness
    running = (patter + from_db(fizz_db) * froth + lively) * (flow + 0.052) ** 0.11
    water = running + from_db(drips_db) * drips * (1 - flow) ** 2
    water = colour(basin_echoes(water + resonate(water, BASIN)), WATER)
    water = water * from_db(flutter_db * drift(rate=64))
    # below about 7000 Hz is the body of the water, the rest is fine mist
    body = signal.sosfiltfilt(signal.butter(3, 7000, fs=SR, output="sos"), water)
    mist = water - body
    bathroom_time = TIME < CUT_S
    spray = from_db(spray_db) * mist / mist[bathroom_time].std()
    body = from_db(water_db + water_gain_db) * body / body[bathroom_time].std()
    return body + spray + gurgle(water_db, liveliness) + bowl_drumming(water_db, flow, liveliness)


def bathroom():
    """Put water, tap and basin in a small hard room, over hum and handling rumble."""
    water = stream() + splashes() + drops() + bubbles()
    knocks = tap_knocks() + squeak() + bumps()
    sounds = room(water + knocks, fade_s=0.22, wet_db=-11.0, wall_hz=9940)
    return from_db(-1.5) * sounds + mains_hum() + handling_rumble()


def scene():
    """Play the bathroom, which gives way at once to the kitchen."""
    return np.where(TIME < CUT_S, bathroom(), kitchen())[None]


CUTOFF_HZ = 15900


def record(dry):
    """Cut the top steeply with an elliptic low-pass filter."""
    return signal.sosfilt(signal.ellip(10, .2, 80, CUTOFF_HZ, fs=SR, output="sos"), dry)


dry = scene()
out = record(dry)
log_audio(out)
```